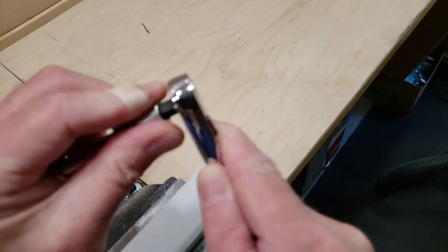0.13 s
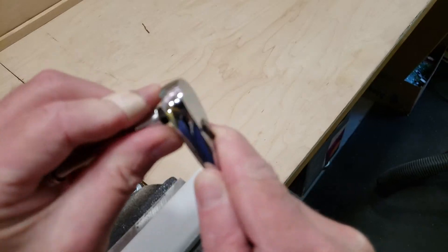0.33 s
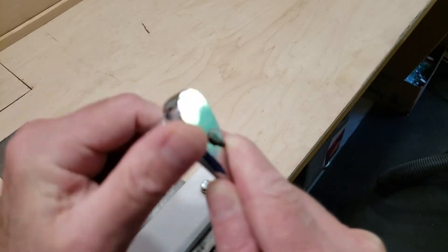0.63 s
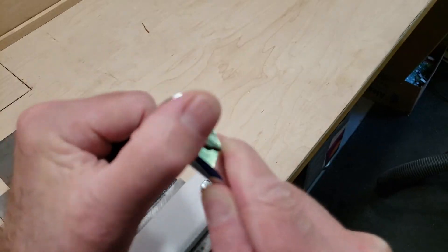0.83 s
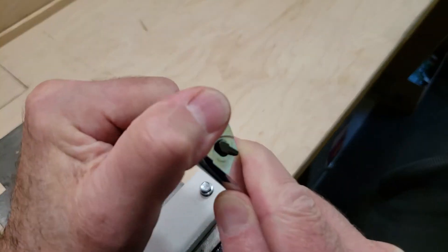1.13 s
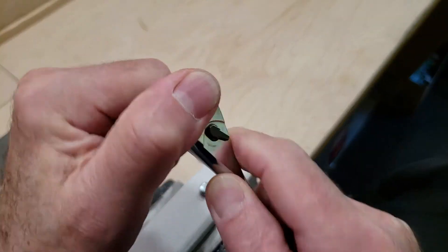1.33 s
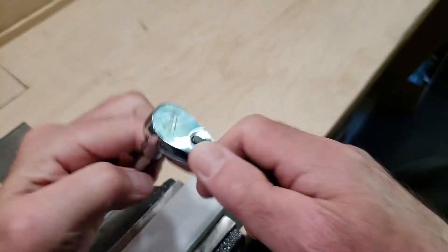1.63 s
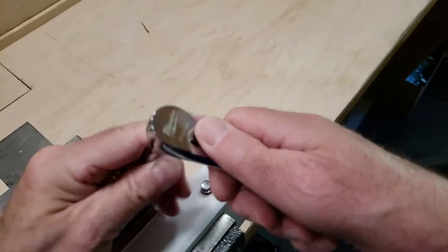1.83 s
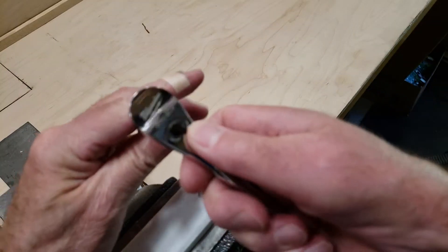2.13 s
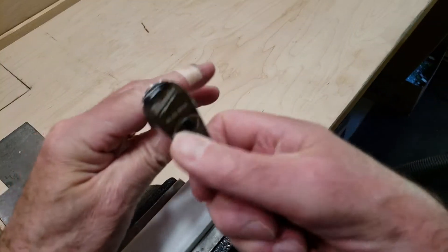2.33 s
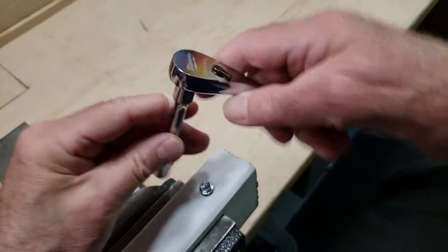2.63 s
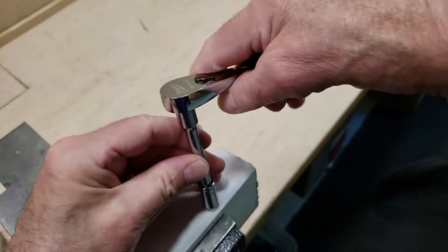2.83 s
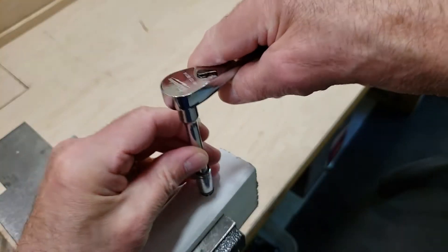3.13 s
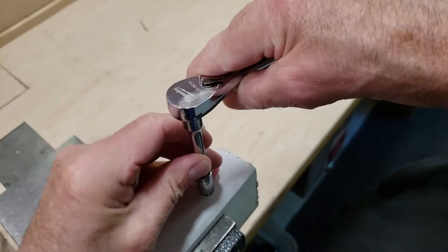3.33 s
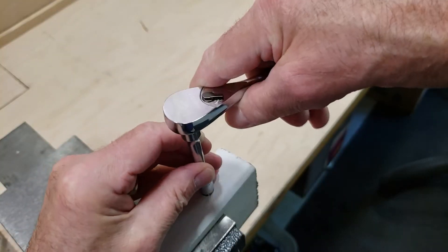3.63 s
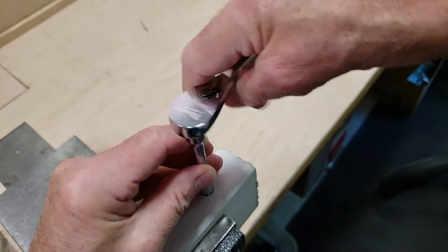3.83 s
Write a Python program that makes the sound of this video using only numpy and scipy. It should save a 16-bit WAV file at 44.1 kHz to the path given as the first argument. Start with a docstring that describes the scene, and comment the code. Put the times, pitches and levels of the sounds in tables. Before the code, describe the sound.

A ratchet wrench, heard up close over faint workshop hiss and hum, ticks sparsely at first. Sharp, briefly ringing metal knocks and a tiny scrape follow as the socket seats, ending in a fast burst of ratcheting.

```python
"""Ratchet at the workbench

A small steel ratchet ticks in the hands, close up, over the hiss and low hum of a quiet workshop.
Its socket knocks and scrapes onto a bolt in a metal block; the block rings and the bench booms.
Then the handle swings back and the pawl snaps over the teeth. Each contact is a fast-dying noise
burst coloured like steel, the block is a set of damped sines, and a short room tail sits behind."""
import sys
import numpy as np
from scipy import signal
from scipy.fft import rfft, irfft
from scipy.io import wavfile
from scipy.ndimage import uniform_filter1d

SR = 44100
rng = np.random.default_rng(int(sys.argv[2]) if len(sys.argv) > 2 else 0)


def wav_record(signal):
    """Record a signal, one row per channel, as 16-bit PCM in the file named by sys.argv[1]."""
    frames = np.transpose(np.atleast_2d(signal))
    bounded = np.clip(frames, -1, 1)
    # unit amplitude maps onto the largest positive 16-bit level
    quanta = np.round(bounded * 32767).astype(np.int16)
    wavfile.write(sys.argv[1], SR, quanta)


N = 176400
TIME = np.arange(N) / SR
HZ = np.fft.rfftfreq(4096, 1 / SR)  # frequency grid of the EQ curves

# Room tone spectrum: freq_hz, gain_db
AIR_EQ = [(15, -39.5), (25, -6.5), (92, -12), (153, -5), (166, -13.5), (200, -28.5), (223, -10), (249, -1),
          (326, -13), (384, -16), (775, -28.5), (988, -31), (9070, -37.5), (14400, -36), (16000, -43)]
# Left-right likeness of the room tone: freq_hz, correlation
AIR_LIKENESS = [(30, 0.33), (130, 1), (350, 0.82), (900, 0.1), (3000, 0.03)]
# Room tone, left against right: freq_hz, gain_db
AIR_LEFT_EQ = [(40, -1.5), (200, -4.0), (2000, -1.5)]
# Resonances of the room hum: centre_hz, width_hz, level_db
HUM_BANDS = [(153.1, 42, -68.5), (255.9, 9.6, -72.5)]
# Soft low bumps: peak_s, half_length_s, level_db
BUMPS = [(1.356, 0.051, -57), (1.765, 0.051, -57.5), (1.863, 0.023, -51.5)]
# Their spectrum: freq_hz, gain_db
BUMP_EQ = [(15, -2.5), (35, -3.5), (90, -10.5), (200, -25.5), (600, -57)]

# Ticks and tiny rubs of the tool in the hands:
# start_s, level_db, decay_s, ring_hz, ring_db, second_ring_hz, bass_db, treble_db
HAND_TICKS = [(0.1818, -13.5, 0.0025, 7870, 10, 1880, 7, -3.5),
              (0.1853, -15, .0007, 4320, 6, 1850, 4.5, 0.5), (.918, -29, 0.012, 4970, 9, 2390, -3, -14),
              (1.0113, -15.5, 0.0015, 5000, 13, 2380, 5.5, -9), (1.13, -34, 0.0024, 3450, 7, 2300, 6, -25),
              (1.401, -37.5, 0.0034, 2860, 15, 1300, 15, -29), (1.42, -35.5, 0.0016, 6050, -4, 2970, 6, -4),
              (1.535, -37, .002, 5060, 12, 3500, -8, -11), (2.2452, -24, 0.0059, 6440, 20, 11500, -5, 0),
              (2.2513, -16.5, 0.0002, 6100, 13, 3100, 0, 4.5),
              (2.2532, -4, 0.00036, 11430, 18, 3160, -1, -3.5),
              (2.4362, -36.5, 0.004, 10800, 8, 3010, -6, 4.5)]
# Their shared spectrum: freq_hz, gain_db
TICK_EQ = [(300, -19.5), (800, -20), (1100, -18), (2500, -8), (4400, -2), (7000, 1), (9300, -9),
           (12000, -0.5), (16000, -13)]
# Shelves that tilt a contact's tone: freq_hz, weight
BASS_SHELF = [(1700, 0.94), (3200, 0.084)]
TREBLE_SHELF = [(4500, 0.033), (9000, 1.0)]

# Socket knocks on the bolt:
# start_s, level_db, ring_hz, ring_db, bass_db, treble_db, block_db, clank_decay_s
SOCKET_KNOCKS = [(2.779, 11, 3793, 16.5, -17.5, -4, 5.5, 0.016), (2.786, 8.5, 4720, 7.5, 2, -15, -1, 0.045),
                 (2.8577, 7, 3830, 7, 0.5, -10, -4, 0.0049), (3.1535, 5.5, 7240, 7, -6, 2, 9, 0.0096),
                 (3.1631, 14, 4220, 4, 2.5, -6.5, -5.5, 0.015),
                 (3.3128, -12.5, 2760, 12.5, 19.5, -21, -12, 0.0057),
                 (3.444, -36.5, 1904, 3, 26, -19, -8, .01)]
# A knock's bright attack: freq_hz, gain_db
KNOCK_SNAP_EQ = [(100, -25), (550, -28), (900, -18), (1800, -7), (2300, -19), (2900, -8.5), (4300, -6),
                 (6000, -6), (7500, 2.5), (9500, -2), (13000, -0.5), (16000, -18.5)]
# A knock's clanking body: freq_hz, gain_db
KNOCK_CLANK_EQ = [(100, -24), (300, -24), (550, -26), (800, -6), (1130, -12.5), (1350, -9), (1560, -18.5),
                  (1850, -9), (2300, -17), (2800, -4), (4700, -4.5), (5700, -13), (7500, -18), (16000, -20)]
# Modes of the block with the socket on it: pitch_hz, level_db, t60_s
BLOCK_MODES = [(691, 0.5, 0.26), (914, -8.5, 0.22), (980, 3.5, 0.38), (1035, 7.5, 0.25), (1359, 12, 0.11),
               (1804, 7.5, 0.055), (2743, 7, 0.052), (2940, 4, 0.27), (3510, -8.5, 0.26), (3690, 4.5, .15),
               (3700, 6, 0.12), (4200, 11.5, 0.064), (4560, -0.5, 0.23), (4870, 2, 0.17), (6400, -4, 0.075)]
# Boom of the bench under the block: freq_hz, gain_db
BENCH_EQ = [(50, -44.5), (90, -7.5), (140, -23.5), (245, -10), (330, -16), (450, -22), (600, -27.5),
            (1500, -80)]

# Envelope of the socket sliding round the bolt head: time_s, level_db
SCRAPE_ENVELOPE = [(2.967, -73), (2.979, -39.5), (3.003, -34), (3.024, -42), (3.044, -65)]
# Spectrum of the scrape: freq_hz, gain_db
SCRAPE_EQ = [(300, -10), (580, -17.5), (800, 2), (1000, 1), (1400, -6.5), (2250, -13.5), (2900, -3.5),
             (5000, -4.5), (6200, -10.5), (8000, 0.5), (9500, -25), (16000, -37)]
# How the scrape drives the block: freq_hz, gain_db
SCRAPE_BLOCK_EQ = [(1400, -3.5), (2500, -6)]

# The pawl drops off a tooth: start_s, level_db, body_db, ping_hz
PAWL_CLICKS = [(3.8495, -5, -9.5, 11900), (3.871, -2.5, -5, 3250), (3.886, 0.5, -8, 12000),
               (3.8981, -0.5, -2, 5900), (3.9086, 3.5, -8, 7600), (3.919, 0.5, -5.5, 6140),
               (3.9326, -2, -3, 13800), (3.9498, 2, -7.5, 4200), (3.9688, -1, -4.5, 4270),
               (3.9839, -1, -4.5, 4560), (3.9962, -0.5, -6.5, 3600)]
# The pawl's attack: freq_hz, gain_db
PAWL_SNAP_EQ = [(300, -30.5), (1100, -22), (1800, 0), (2300, -23), (3200, -8.5), (5800, -2), (8000, -5),
                (9800, -9.5), (11800, -5), (12700, -17), (13700, -2.5), (16000, -15)]
# Ring of the ratchet head and extension: freq_hz, gain_db
PAWL_BODY_EQ = [(300, -21.5), (700, -11.5), (1350, -4.5), (1550, -11.5), (1810, -2.5), (2250, -17.5),
                (2800, 4.5), (3600, 2.5), (4250, 10), (5200, -2), (7800, -6), (10000, -12)]

# Decay of the workshop's short tail: freq_hz, t60_s
ROOM_DECAY = [(200, .4), (800, 0.38), (2000, 0.18), (4500, 0.21), (9000, 0.12), (15000, 0.14)]
# Left-right likeness of contacts and reflections: freq_hz, correlation
MIC_LIKENESS = [(300, 1), (1200, 0.34), (3000, 0.8), (5000, 0.27), (9000, 0.16)]
# The tool in the left microphone against the right: freq_hz, gain_db
LEFT_MIC_EQ = [(200, -2.5), (600, 0), (1200, -2.5), (3000, -4.5), (5000, -4.5), (8500, -7.5), (13000, -4.5)]


def amp(db):
    """Decibels to gain."""
    return 10 ** (np.asarray(db) / 20)


def unit_rms(x):
    """Scales to an rms of one."""
    return x / np.sqrt(np.mean(x ** 2) + 1e-20)


def curve(points, hz=HZ):
    """Reads a table on a log-frequency axis."""
    freqs, values = np.transpose(points)
    return np.interp(np.log(hz + 1), np.log(freqs + 1), values)


def peak(hz, db, width_octaves=0.085):
    """A narrow resonant bump for an EQ curve."""
    return db * np.exp(-(np.log2((HZ + 1) / hz) / width_octaves) ** 2)


def eq(x, curve_db):
    """Minimum-phase EQ: nothing rings ahead of an attack."""
    cepstrum = irfft(np.log(amp(np.maximum(curve_db, -100))))
    half = len(cepstrum) // 2
    taps = irfft(np.exp(rfft(np.r_[cepstrum[0], 2 * cepstrum[1:half], np.zeros(half)])))
    return signal.fftconvolve(x, taps[None], axes=1)[:, :x.shape[1]]


def place(mix, start_s, sound):
    """Drops a stereo sound into the mix."""
    part = mix[:, round(start_s * SR):][:, :sound.shape[1]]
    part += sound[:, :part.shape[1]]


def blend(shared, other, likeness):
    """Equal-power mix of two noises, correlated with the first by `likeness`."""
    return likeness * shared + np.sqrt(1 - likeness ** 2) * other


def stereo_noise(size, likeness):
    """White noise, partly alike left and right."""
    right, other = rng.standard_normal((2, size))
    return np.array([blend(right, other, likeness), right])


def mic_noise(size):
    """Noise at the two microphones: centred in the bass, wide in the treble."""
    right, other = rfft(rng.standard_normal((2, size)))
    likeness = curve(MIC_LIKENESS, np.fft.rfftfreq(size, 1 / SR))
    return irfft(np.array([blend(right, other, likeness), right]), size)


def room_tone():
    """The bed: faint hiss, a low resonant hum and a few soft bumps, all shaped noise."""
    hz = np.fft.rfftfreq(N, 1 / SR)
    right, other = rfft(rng.standard_normal((2, N)))
    left = amp(curve(AIR_LEFT_EQ, hz)) * blend(right, other, curve(AIR_LIKENESS, hz))
    bed = amp(-64.5) * unit_rms(irfft(np.array([left, right]) * amp(curve(AIR_EQ, hz))))
    for centre_hz, width_hz, level_db in HUM_BANDS:
        hum = irfft(rfft(stereo_noise(N, 0.85)) / (1 + (2 * (hz - centre_hz) / width_hz) ** 2))
        bed += amp(level_db) * amp([[-2.5], [0]]) * unit_rms(hum)
    swell = sum(amp(db) * np.exp(-((TIME - peak_s) / half_s) ** 2) for peak_s, half_s, db in BUMPS)
    rumble = irfft(rfft(stereo_noise(N, 0.27)) * amp(curve(BUMP_EQ, hz)))
    return bed + swell * amp([[-8], [3]]) * unit_rms(rumble)  # bumps lean right


def steel_contact(decay_s, curve_db, grain=None, rise_s=0.00015):
    """One contact: noise stands for crowded steel modes that start at once and die quickly."""
    t = TIME[:SR // 6]
    grain = mic_noise(len(t)) if grain is None else grain
    spectrum = rfft(grain * np.exp(-t / decay_s) * (1 - np.exp(-t / rise_s)))
    # Flatten the burst so that the EQ curve sets its tone and level.
    contour = np.sqrt(uniform_filter1d(abs(spectrum) ** 2, size=150, axis=1) + 1e-12)
    return eq(irfft(spectrum / contour) * (t < 0.15), curve_db)


def contact_tone(ring_hz, ring_db, bass_db, treble_db):
    """EQ given by the point of contact: one favoured ring, more or less bass and treble."""
    return peak(ring_hz, ring_db) + bass_db * curve(BASS_SHELF) + treble_db * curve(TREBLE_SHELF)


def hand_ticks(ring_share):
    """Loose parts of the tool touch, damped by the fingers."""
    ticks = np.zeros((2, N))
    for start_s, level_db, decay_s, ring_hz, ring_db, second_hz, bass_db, treble_db in HAND_TICKS:
        tone = contact_tone(ring_hz, ring_share * ring_db, bass_db, treble_db) + peak(second_hz, db=7.5)
        place(ticks, start_s, steel_contact(decay_s, level_db + curve(TICK_EQ) + tone))
    return ticks


def socket_knocks(ring_share, snap_decay_s=0.0021):
    """The socket hits the bolt. Two stems: snap with clank, and block and bench ringing on."""
    hits, rings = np.zeros((2, 2, N))
    for start_s, level_db, ring_hz, ring_db, bass_db, treble_db, block_db, clank_s in SOCKET_KNOCKS:
        tone = level_db + contact_tone(ring_hz, ring_share * ring_db, bass_db, treble_db)
        snap = steel_contact(snap_decay_s, tone + curve(KNOCK_SNAP_EQ))
        clank = steel_contact(clank_s, tone + curve(KNOCK_CLANK_EQ))
        place(hits, start_s, snap + clank)
        block = block_ring(level_db + block_db + contact_tone(ring_hz, 0, bass_db, treble_db))
        place(rings, start_s, block + bench_boom(level_db + bass_db))
    return hits, rings


def block_ring(drive_db, rise_s=0.0014):
    """The block's modes ring as damped sines, each as hard as the drive curve excites it."""
    t = TIME[:SR // 2]
    ring = np.zeros((2, len(t)))
    for pitch_hz, level_db, t60_s in BLOCK_MODES:
        phase = 2 * np.pi * rng.random() + 0.5 * rng.standard_normal((2, 1))
        damping = np.log(1000) / t60_s
        gain = amp(level_db + np.interp(pitch_hz, HZ, drive_db)) * 2 * damping / SR
        ring += gain * np.exp(-damping * t) * np.sin(2 * np.pi * pitch_hz * t + phase)
    return ring * (1 - np.exp(-t / rise_s))


def bench_boom(level_db, rise_s=0.02, decay_s=0.054):
    """The bench top's low boom swells and dies away under a knock."""
    t = TIME[:SR // 2]
    boom = stereo_noise(len(t), 0.93) * np.exp(-t / decay_s) * (1 - np.exp(-t / rise_s))
    return eq(boom / np.linalg.norm(boom[1]), level_db + curve(BENCH_EQ))


def socket_scrape(slips_per_s=2900):
    """Tiny slips of steel on steel make a gritty rub and set the block ringing."""
    times_s, levels_db = np.transpose(SCRAPE_ENVELOPE)
    envelope = amp(np.interp(TIME, times_s, levels_db, left=-200, right=-200))
    slips = unit_rms(stereo_noise(N, 0.65) * (rng.random(N) < slips_per_s / SR))
    rub = eq(slips * envelope, curve(SCRAPE_EQ))
    return rub + signal.fftconvolve(rub, block_ring(curve(SCRAPE_BLOCK_EQ)), axes=1)[:, :N]


def pawl_clicks():
    """The pawl snaps down, ringing head, extension and block; a duller echo follows about 3 ms later."""
    snap_decay_s, body_decay_s, echo_decay_s = 0.0006, 0.006, 0.00073
    head_hz, echo_delay_s, echo_db, block_db = 1820, 0.0028, -2, -8
    clicks = np.zeros((2, N))
    head_grain = mic_noise(SR // 6)
    block = block_ring(np.full(len(HZ), block_db))
    for start_s, level_db, body_db, ping_hz in PAWL_CLICKS:
        snap_tone = level_db + peak(ping_hz, db=8.5) + curve(PAWL_SNAP_EQ)
        body_tone = level_db + body_db + peak(head_hz, db=6) + curve(PAWL_BODY_EQ)
        grain = blend(head_grain, mic_noise(SR // 6), likeness=0.88)  # much the same ring every tooth
        place(clicks, start_s, steel_contact(snap_decay_s, snap_tone))
        place(clicks, start_s, steel_contact(body_decay_s, body_tone, grain))
        echo_s = start_s + echo_delay_s * rng.uniform(0.85, 1)
        place(clicks, echo_s, steel_contact(echo_decay_s, body_tone + echo_db, grain))
        place(clicks, start_s, amp(level_db) * block)
    return clicks


def workshop_reverb(send):
    """Early reflections from the bench, a short workshop tail and a faint late one."""
    early_db, early_decay_s = -18, 0.006
    tail_db, late_db, late_stretch = -8.5, -15, 3.1
    t = TIME[:SR * 2 // 3]
    hz, frame_s, spectra = signal.stft(mic_noise(len(t)), SR, nperseg=256)
    fall_db = -60 * frame_s / curve(ROOM_DECAY, hz)[:, None]
    decay = amp(fall_db) + amp(late_db + fall_db / late_stretch)
    fade_in = np.clip((t - 0.004) / 0.0032, 0, 1)
    tail = signal.istft(spectra * decay, SR, nperseg=256)[1][:, :len(t)] * fade_in
    early = mic_noise(len(t)) * (t > 0.005) * np.exp(-t / early_decay_s)
    response = (amp(tail_db) * unit_rms(tail) + amp(early_db) * unit_rms(early)) / np.sqrt(len(t))
    return signal.fftconvolve(send, response, axes=1)[:, :N]


def pan_right(x, delay_samples=2):
    """The left microphone hears the tool later and softer."""
    left = eq(x[:1], curve(LEFT_MIC_EQ))[0]
    return np.array([np.pad(left, (delay_samples, 0))[:N], x[1]])


def scene():
    """The mix: the tool and its reverb sit to the right, over the room tone."""
    hits, rings = socket_knocks(ring_share=1)
    clicks, scrape = pawl_clicks(), socket_scrape()
    # A contact's favoured ring is beamed at the microphone: the room gets half its boost in dB.
    room_hits, _ = socket_knocks(ring_share=0.5)
    room_ticks = hand_ticks(ring_share=0.5)
    reverb = workshop_reverb(room_hits + scrape + amp(-0.5) * room_ticks + amp(-2) * clicks)
    direct = hand_ticks(ring_share=1) + hits + rings + scrape + clicks
    return pan_right(direct + reverb) + room_tone()


def record(dry):
    """A steep low-pass trims the very top."""
    lowpass = signal.firwin(255, cutoff=16200, window=("kaiser", 8), fs=SR)
    return signal.oaconvolve(dry, lowpass[None], "same")


dry = scene()
out = record(dry)
wav_record(out)
```